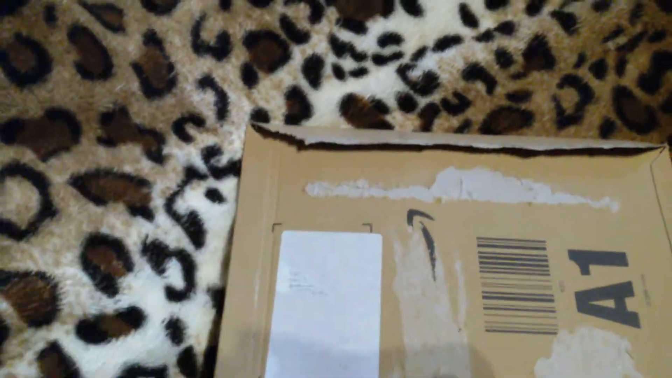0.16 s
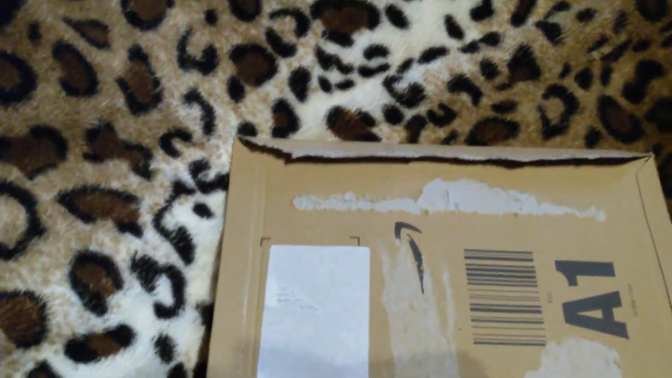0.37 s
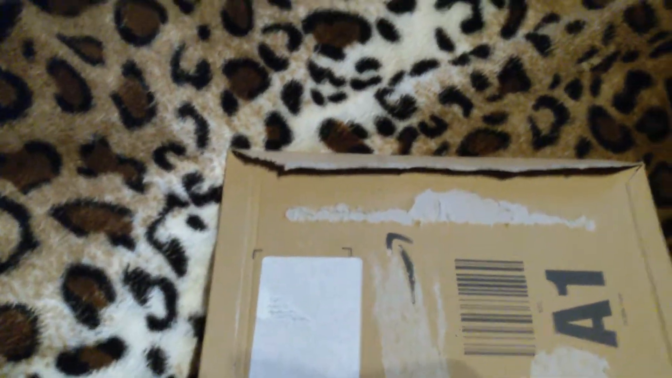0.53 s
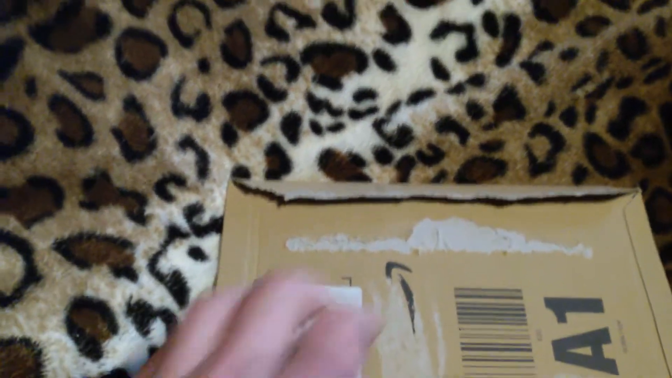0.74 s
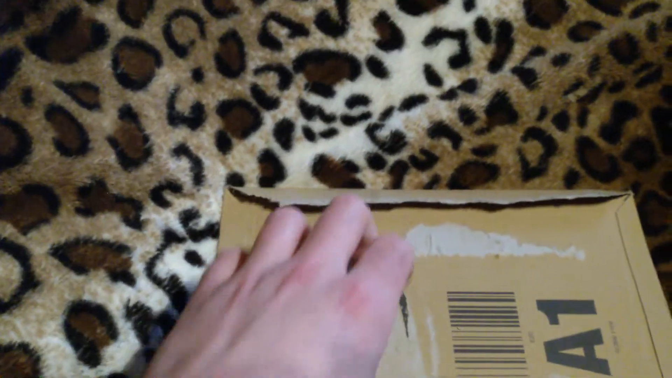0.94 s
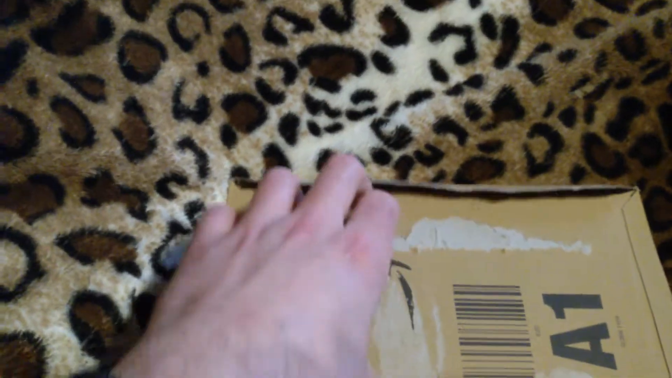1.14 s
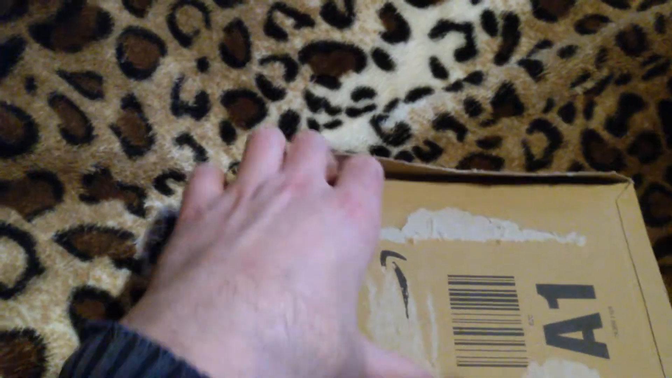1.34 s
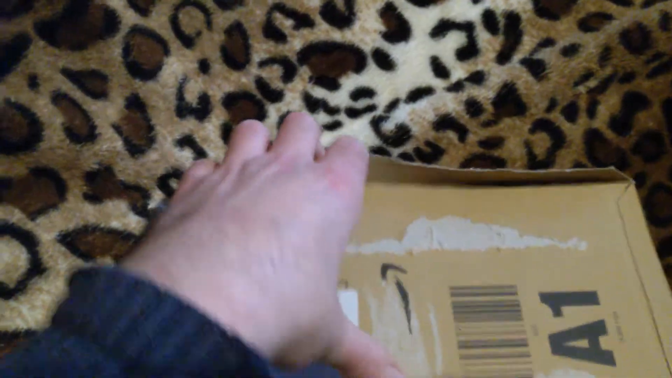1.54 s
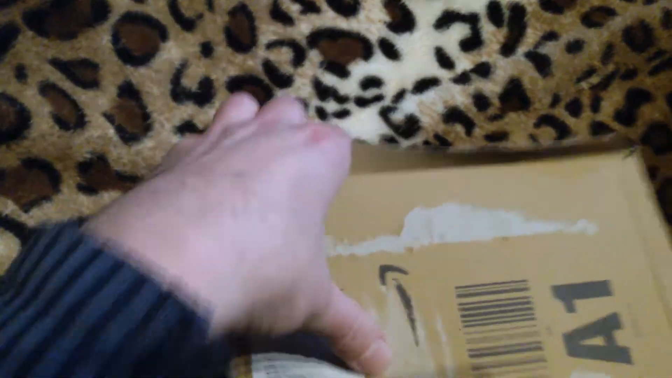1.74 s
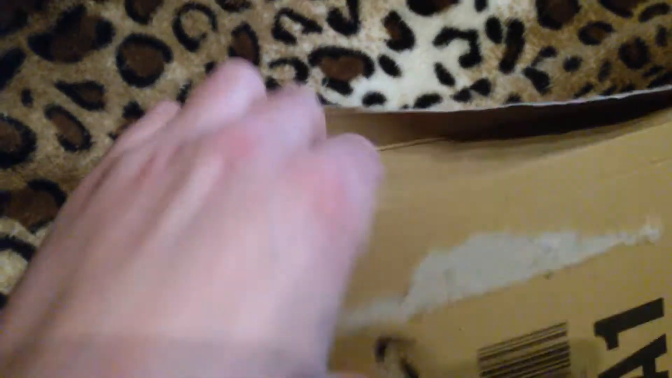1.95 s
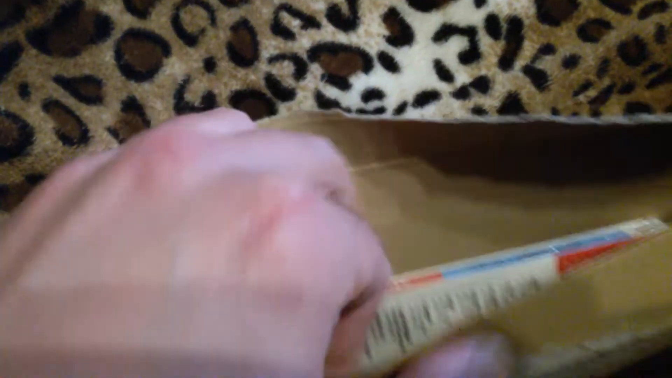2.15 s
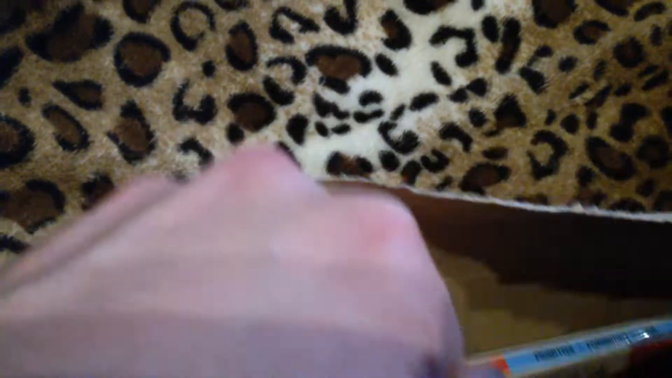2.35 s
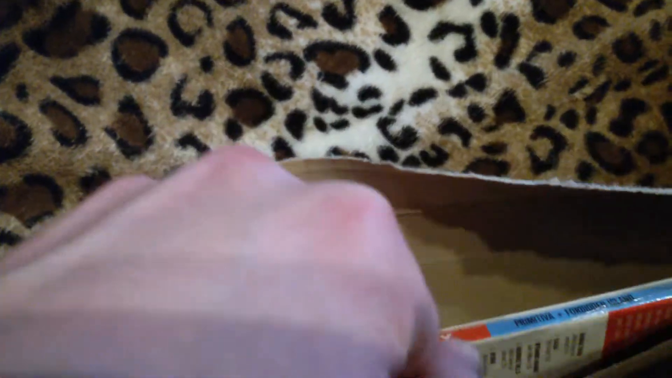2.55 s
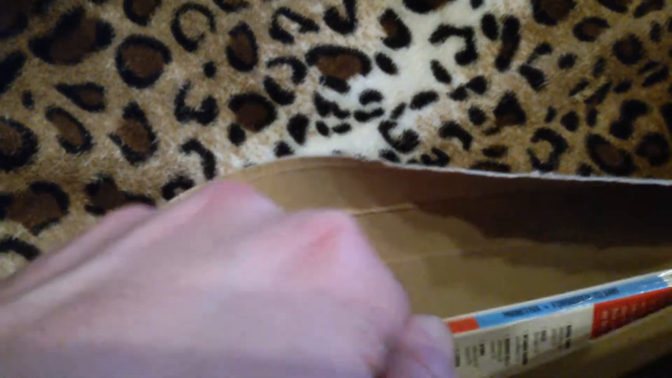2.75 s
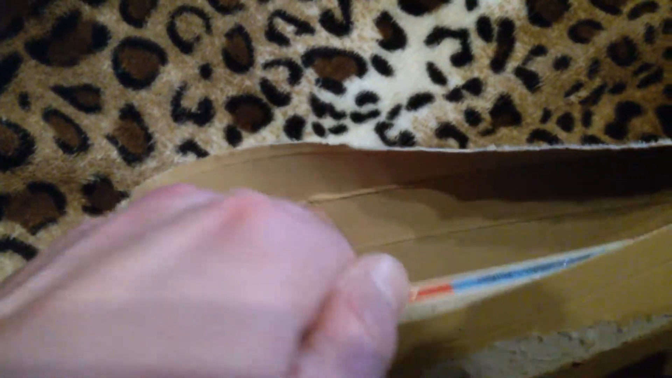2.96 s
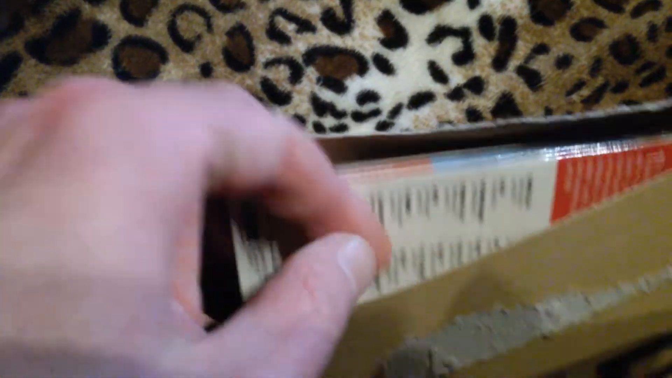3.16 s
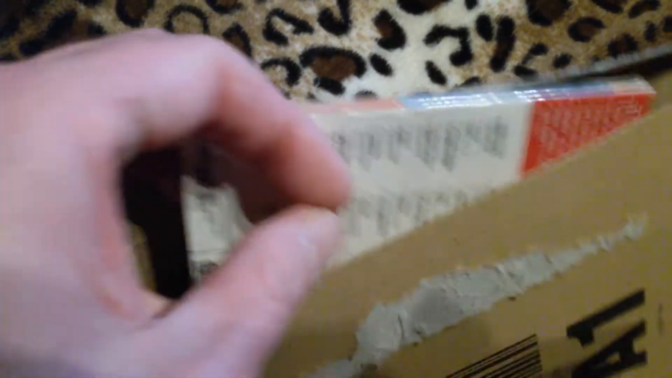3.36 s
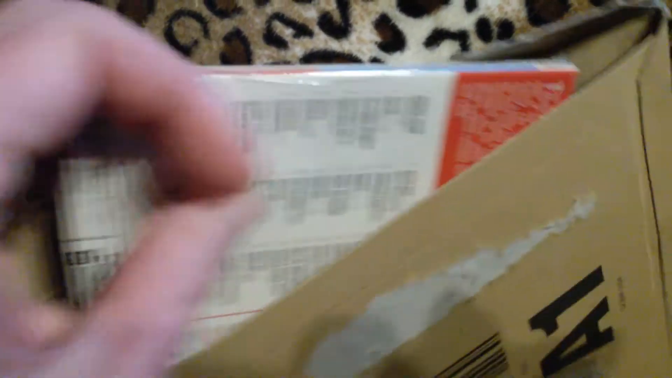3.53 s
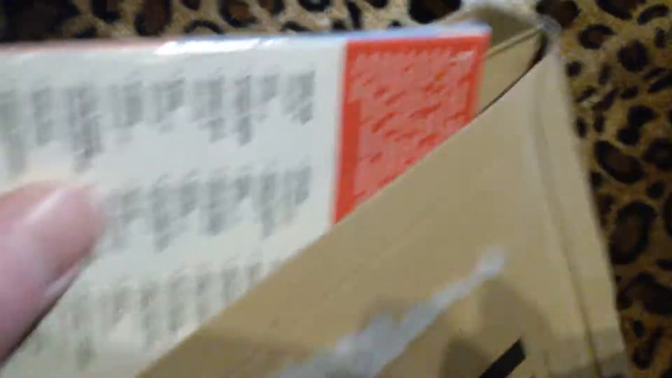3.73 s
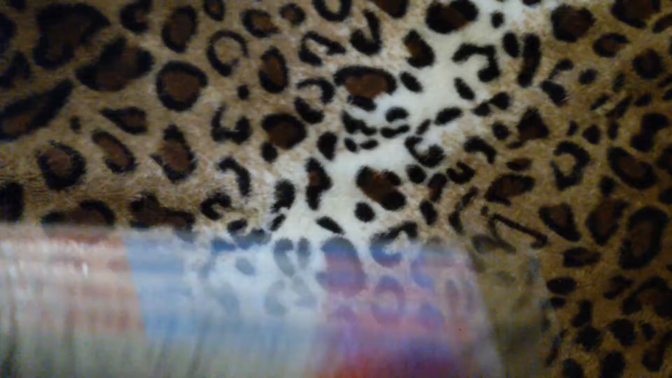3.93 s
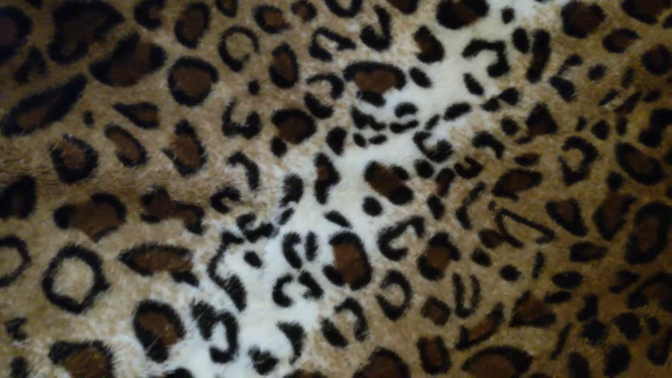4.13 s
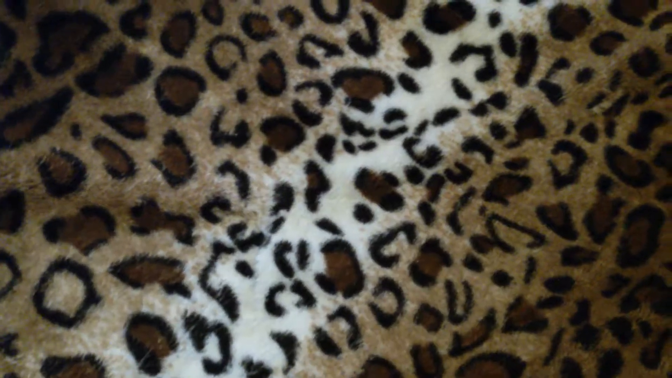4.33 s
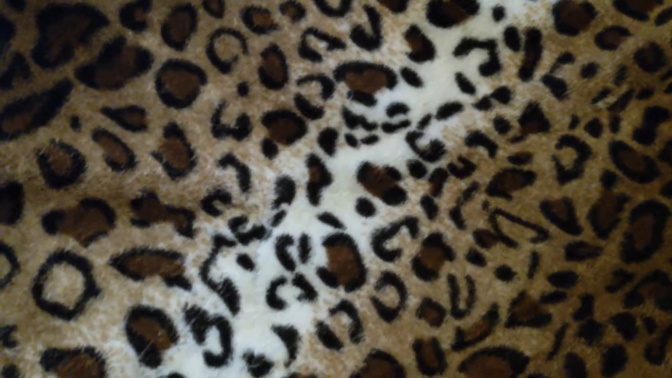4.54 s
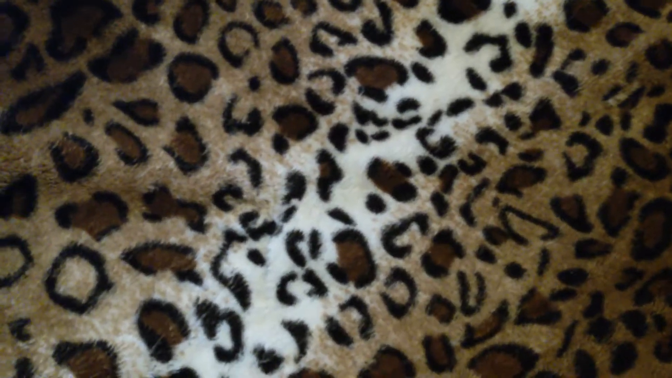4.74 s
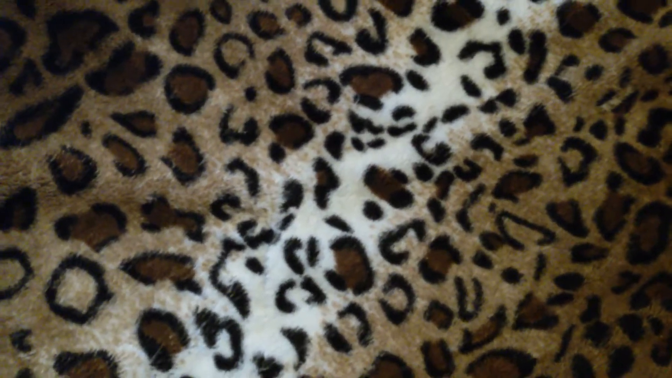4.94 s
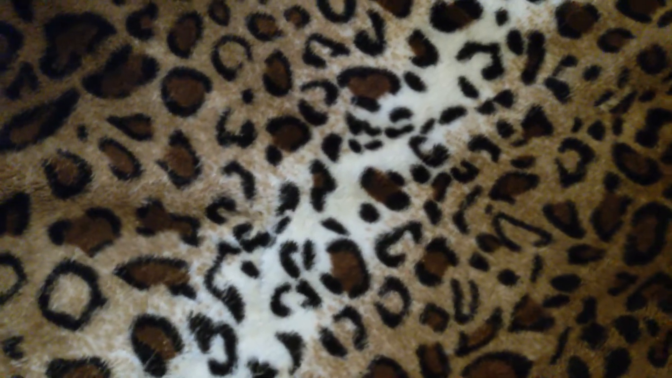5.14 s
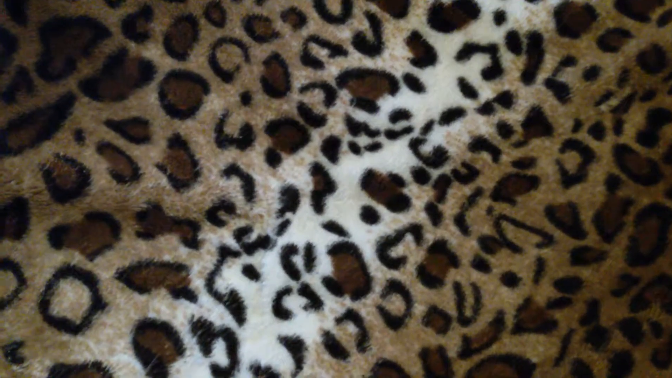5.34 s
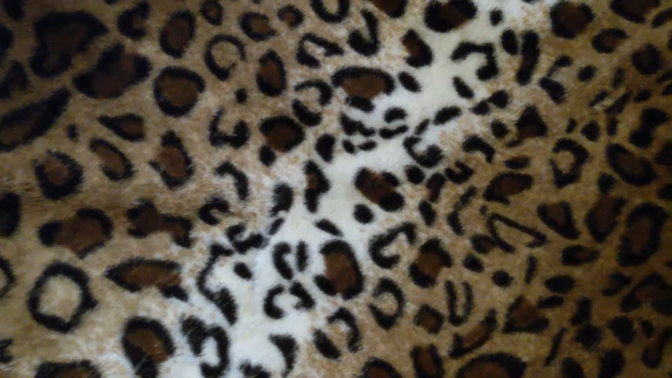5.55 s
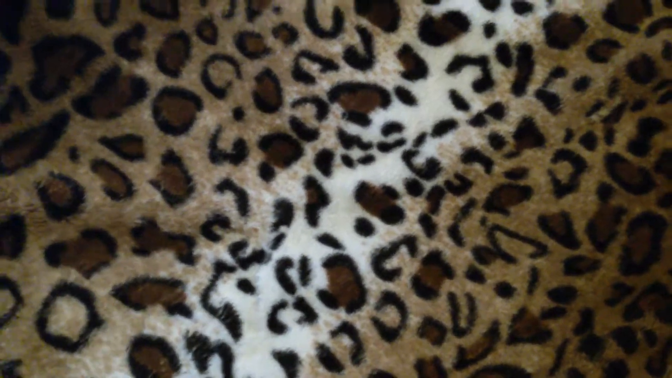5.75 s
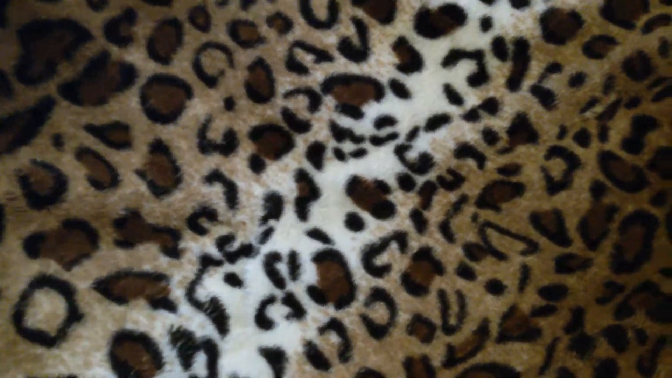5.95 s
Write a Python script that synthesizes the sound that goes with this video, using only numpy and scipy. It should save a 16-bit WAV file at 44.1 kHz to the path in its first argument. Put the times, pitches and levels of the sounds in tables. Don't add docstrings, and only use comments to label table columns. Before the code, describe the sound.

A close, dry indoor sound with steady faint hiss and low rumble, and a very short dull room reflection. At 0 s a crushed paper strip gives a tiny bright crackle that dies within 0.15 s; then almost nothing, except a minute tick at 0.5. From 0.88 s light bumps and papery brushing begin, with small fibre crackles to 1.2. Soft friction and two short even slides follow at 1.45-1.7. From 1.7 snaps and creases thicken, peaking at 1.9-2.25 with a hard knock at 1.97, coarse hollow scraping and low board thumps. Rubbing eases to 2.8, with a tap at 2.74. A short rasp at 3.04 leads into fading slides, and muffled bumps come at 3.35-3.65. Sharp pops and a thump cluster at 4.0-4.1, a slide and bright snap at 4.4-4.65. Near silence, then a flap at 4.9, a tap at 5.29, and quiet rubs at 5.7-5.95.

```python
import sys
import numpy as np
from scipy import signal
from scipy.fft import rfft, irfft
from scipy.io import wavfile
from scipy.ndimage import uniform_filter1d

SR = 44100
rng = np.random.default_rng(int(sys.argv[2]) if len(sys.argv) > 2 else 0)


def wav_record(signal):
    frames = np.transpose(np.atleast_2d(signal))
    bounded = np.clip(frames, -1, 1)
    quanta = np.round(bounded * 32767).astype(np.int16)
    wavfile.write(sys.argv[1], SR, quanta)


def boost_factor(decibels):
    exponent = np.asarray(decibels, float) / 20
    return 10 ** exponent


N = 264156


def rms_one(x):
    return x / np.sqrt(np.mean(x ** 2) + 1e-20)


def in_time(rows):
    s, *columns = np.transpose(rows)
    return [np.interp(np.arange(N) / SR, s, column) for column in columns]


def drift(rate):
    pole = np.exp(-80 * np.pi * rate / SR)
    noise = rng.standard_normal(N // 40 + 2002)
    slow = signal.lfilter([1], [1, -2 * pole, pole * pole], noise)[2000:]
    return np.interp(np.arange(N) / 40, np.arange(len(slow)), rms_one(slow - slow.mean()))


def resonate(x, hz, width_hz):
    r = np.exp(-np.pi * width_hz / SR)
    poles = [1, -2 * r * np.cos(2 * np.pi * hz / SR), r * r]
    return signal.lfilter([(1 - r * r) / 2, 0, (r * r - 1) / 2], poles, x + 1e-18)


def slips(shape, per_s, spread_db):
    sizes = boost_factor(spread_db * np.minimum(rng.exponential(1, shape), 4)) * rng.choice([-1, 1], shape)
    return rms_one(sizes * (rng.random(shape) < per_s / SR))


def body(push, modes, wander_db=0., wander_rate=20., centre_hz=None, favour_db=0., reach=.3, scattered=True):
    out = 0
    signs = rng.choice([-1., 1.], (2, N)) if scattered else [1, -1]
    for k, (hz, width_hz, db) in enumerate(modes):
        near = 0 if centre_hz is None else np.exp(-(np.log2(hz / centre_hz) / reach) ** 2)
        gain = boost_factor(db + favour_db * near + wander_db * drift(wander_rate)) / np.sqrt(width_hz / 3000)
        rung = resonate(push[:N] * signs[k % 2] * gain, hz, width_hz)
        out = out + (-1) ** (k // 2 * scattered) * resonate(rung, hz, 2.5 * width_hz)
    return out


# pitch_hz, level_db (per Hz)
NOISE_COLOUR = [(20, -42), (30, -15), (60, -11.5), (120, -12), (250, -16), (700, -24), (2500, -29.5),
                (14500, -32.5)]


def hiss():
    hz, db = np.transpose(NOISE_COLOUR)
    bins_hz = np.fft.rfftfreq(N, 1 / SR) + 1
    colour = boost_factor(np.interp(np.log(bins_hz), np.log(hz), db)) * (bins_hz > 18)
    noise = irfft(rfft(rng.standard_normal(N)) * colour, N)
    return boost_factor(-68 + 0.25 * drift(0.83)) * rms_one(noise)


# pitch_hz, width_hz, level_db
STRIP_MODES = [(220, 360, -16), (1800, 1300, -13), (4480, 900, -11), (6100, 2200, -12.5),
               (7960, 1600, -6.5), (10500, 4500, -18), (13000, 3800, -20)]
# time_s, level_db
STRIP_LEVEL = [
    (0.0, -43),
    (0.015, -43.5),
    (0.026, -54.5),
    (0.055, -62),
    (0.1, -70),
    (0.13, -75),
]


def paper_strip():
    level_db, = in_time(STRIP_LEVEL + [(STRIP_LEVEL[-1][0] + 0.081, -95)])
    crackle = slips(N, per_s=14000, spread_db=2.5)
    return boost_factor(level_db) * rms_one(body(crackle, STRIP_MODES, wander_db=1.5, wander_rate=180))


def snap_burst(breaks, db, length, first):
    t = np.arange(len(breaks)) / SR
    soft = 1 + (length / .013) ** 4
    breaks = np.where(np.arange(len(breaks)) == 12, first / soft, breaks)
    holds = (1 - np.exp(-t / (.0004 * soft))) * np.exp(-(t / np.clip(length, .001, .03)) ** 2)
    burst = breaks * holds * (1 + 0.5 * np.exp(-t / 0.00078))
    return burst * boost_factor(db) * np.sqrt(np.sum(holds ** 2) / np.sum(burst ** 2))


# pitch_hz, width_hz, level_db
PANEL_MODES = [(1400, 480, 1), (1700, 240, -1.5), (1938, 450, -3.5), (2317, 650, 1.5)]
SURFACE_MODES = [(3320, 500, -6.5), (3900, 690, -6.5), (4550, 1160, -5.5), (5300, 590, -7),
                 (6170, 1430, -5.5), (6900, 1200, -6.5), (7900, 2360, -2.5), (10000, 2500, -17.5),
                 (11340, 2000, -5.5), (14200, 2000, -0.5)]
POCKET_MODES = [(543, 223, 1.5), (667, 380, 2.5), (899, 316, 7.5), (908, 330, 6)]
BENDING_MODES = [(65.4, 39.5, -3.5), (101, 20, -6), (151, 69, -1.5), (212.4, 172, 3), (36, 16, -11.5)]
# pitch_hz, width_hz, level_db
KNOCK_MODES = [(358, 140, -9), (474, 250, 6.5)]
# start_s, level_db, pitch_hz, length_s
FINGER_TAPS = [(0.053, -45, 1600, .002), (1.636, -36, 1400, 0.0018), (1.971, -11, 950, .0028),
               (2.043, -21.5, 1900, .004), (2.044, -26, 3900, 0.0036), (2.136, -25, 810, 0.0061),
               (2.739, -25, 1250, 0.0042), (2.74, -34, 2450, 0.0023), (5.067, -43.5, 550, 0.0044),
               (5.068, -41.5, 1100, 0.0063), (5.2865, -27, 1160, 0.0029), (5.2875, -34, 3880, 0.0024),
               (5.287, -39.5, 6400, 0.0037), (5.2878, -36.5, 1740, 0.0028), (5.439, -39, 1190, 0.0022),
               (5.687, -51, 2000, 0.005)]
# start_s, level_db, pitch_hz, length_s
FIBRE_TEARS = [(0.499, -42, 4500, 0.001), (0.8875, -33, 1900, 0.0044), (0.952, -39, 2000, 0.03),
               (0.982, -37, 2130, 0.012), (1.053, -34.5, 4200, 0.013), (1.183, -36.5, 1950, 0.011),
               (0.938, -45.5, 2000, 0.0032), (0.98, -40, 2520, 0.0015), (1.285, -38.5, 3700, 0.0021),
               (3.249, -39, 6800, 0.026), (3.02, -33, 1800, 0.006), (3.786, -49, 8000, 0.0013),
               (3.803, -44, 9800, 0.0023), (1.7125, -24, 1800, 0.008), (1.7195, -24, 1700, .005),
               (1.8358, -24, 3800, 0.005), (2.997, -43, 1470, 0.011), (3.092, -41.5, 1400, 0.01),
               (3.794, -43, 1400, 0.012), (4.031, -27, 5300, 0.0035), (4.64, -23.5, 8200, 0.0024),
               (4.04, -48, 8700, 0.0036), (4.389, -36.5, 4500, 0.0026), (1.795, -33, 4300, .005)]
# start_s, level_db, pitch_hz, length_s
EDGE_BUMPS = [(0.881, -47, 2420, 0.0055), (0.904, -46, 2200, 0.0094), (1.169, -37, 1920, 0.0081),
              (1.702, -35.5, 2400, 0.0018), (1.793, -30, 700, 0.009), (1.9, -17.5, 1370, 0.0064),
              (1.98, -20.5, 1400, 0.0049), (2.164, -30, 1810, 0.016), (3.401, -30, 1540, 0.011),
              (3.614, -35, 1260, .012), (3.643, -30, 3430, 0.0033), (3.648, -27, 1090, 0.008),
              (3.812, -41, 1770, 0.0045), (3.83, -40.5, 780, 0.0086), (3.881, -44, 1700, 0.016),
              (3.926, -33, 880, 0.006), (4.044, -25.5, 1610, 0.0082), (4.087, -45, 980, 0.013),
              (4.191, -43, 1680, 0.0096), (4.265, -33.5, 1630, 0.0047), (4.294, -39, 1640, 0.0094),
              (4.388, -33.5, 1050, 0.006), (4.897, -31, 1540, 0.0087), (4.911, -37.5, 1530, 0.0067)]
# start_s, level_db, pitch_hz, length_s
CREASE_POPS = [(1.032, -39, 2020, 0.012), (1.82, -24, 1660, 0.0015), (1.872, -29.5, 1510, 0.007),
               (2.014, -27, 1600, 0.0033), (2.025, -27, 1700, 0.0027), (1.836, -18.5, 1700, 0.009),
               (3.058, -37, 1900, 0.0025), (3.348, -29, 2000, 0.011), (3.443, -33, 1750, 0.037),
               (4.005, -39, 1010, 0.0078), (4.055, -28, 1200, 0.0023), (4.059, -18, 1400, 0.0024),
               (4.251, -40.5, 1370, 0.0094), (4.629, -27, 2110, 0.011), (5.842, -49, 2830, 0.0098)]
# surface_db, thump_db, panel_db, ring width against pitch, size of opening break
FIBRE_SHARES = (-1.1, -15.5, -2, 0.38, 4.5)
CREASE_SHARES = (-27, -13.5, 4, 0.54, 6.5)
BUMP_SHARES = (-13.5, -3.5, -1.5, 0.76, 7)
TAP_SHARES = (-17, -17, -9, .45, 3)


def snaps():
    size = SR // 10
    t = np.arange(size) / SR
    kinds = ((FIBRE_TEARS, FIBRE_SHARES), (CREASE_POPS, CREASE_SHARES),
             (EDGE_BUMPS, BUMP_SHARES), (FINGER_TAPS, TAP_SHARES))
    events = [(*row, *shares) for rows, shares in kinds for row in rows]
    all_breaks = slips((len(events), size), per_s=16000, spread_db=2.5)
    ring, panel, surface, spit, thump = np.zeros((5, N + size))
    for event, breaks in zip(events, all_breaks):
        s, db, hz, length, surface_db, thump_db, panel_db, width, first = event
        at = slice(round(s * SR), round(s * SR) + size)
        burst = snap_burst(breaks, db, length, first)
        rung = resonate(resonate(burst, hz, 1.4 * hz), hz, width * hz)
        ring[at] += rung / np.sqrt(hz / 1500 * width / .65)
        panel[at] += boost_factor(panel_db) * burst * min(1, 3000 / hz)
        surface[at] += boost_factor(surface_db) * burst
        spit[at] += boost_factor(surface_db + 1.6 * db + 4.0) * burst
        thump[at] += boost_factor(db + thump_db) * (t / 0.0012) * np.exp(-t / 0.00052)
    when_s, _, rings_hz = np.array(sorted(events))[:, :3].T
    latest = np.searchsorted(when_s * SR, np.arange(N), "right") - 1
    struck_hz = rings_hz[np.clip(latest, 0, None)]
    board = boost_factor(-12) * body(panel, PANEL_MODES + POCKET_MODES, centre_hz=struck_hz, favour_db=2.5,
                            reach=0.2, scattered=False)
    board = board + boost_factor(-1.0) * body(surface, SURFACE_MODES)
    crack_low = signal.butter(4, 6770, fs=SR, output="sos")
    crack = signal.sosfilt(crack_low, boost_factor(9.5) * ring[:N] + board)
    spit_high = signal.butter(2, 9050, "high", fs=SR, output="sos")
    thumps = body(thump, BENDING_MODES + KNOCK_MODES, scattered=False)
    return crack + thumps + signal.sosfilt(spit_high, spit[:N])


def stroke(s, db, rise, fall):
    t = np.arange(0, N + 32, 32) / SR - s
    away = np.abs(t) / np.clip(np.where(t < 0, rise, fall), .004, 1)
    return boost_factor(2 * (db - 20 * away ** 0.7))


def slide(start, end, start_db, end_db):
    t = np.arange(0, N + 32, 32) / SR
    edge_s = 0.0092
    edges = (1 + np.tanh((t - start) / edge_s * 2)) * (1 - np.tanh((t - end) / edge_s)) / 4
    return edges ** 2 * boost_factor(2 * np.interp(t, [start, end], [start_db, end_db]))


# middle_s, half_length_s, level_db
HAND_PAUSES = [
    (0.93, 0.0074, -18),
    (2.529, 0.0048, -6),
    (2.812, 0.02, -10),
    (3.749, 0.022, -8),
    (4.153, 0.027, -2.5),
    (4.356, 0.038, -7),
    (4.778, 0.11, -29),
]


def gain_curve(power):
    t = np.arange(len(power)) * 32 / SR
    hush_db = sum(db * np.exp(-((t - s) / half) ** 4) for s, half, db in HAND_PAUSES)
    return np.interp(np.arange(N) / 32, np.arange(len(power)), np.sqrt(power) * boost_factor(hush_db))


# peak_s, level_db, length_s
BOARD_BENDS = [(0.686, -59, 0.024), (0.735, -59, 0.019), (0.897, -56, 0.029), (1.03, -54.5, 0.21),
               (1.169, -55.5, 0.088), (1.347, -62, 0.14), (1.483, -53, 0.15), (1.583, -52, 0.033),
               (1.658, -54, 0.1), (1.832, -43, 0.05), (2.058, -35.5, 0.11), (2.17, -39.5, 0.18),
               (2.31, -53, 0.1), (2.59, -49.5, 0.15), (2.766, -57, 0.056), (3.065, -51.5, 0.16),
               (3.19, -59.5, 1), (3.44, -57, 0.15), (3.646, -55, 0.27), (3.808, -45, 0.048),
               (3.94, -51, 0.077), (4.06, -38, 0.048), (4.264, -51, 0.22), (4.437, -47, 0.089),
               (4.571, -41.5, 0.046), (4.667, -52, 0.06), (4.91, -46, 0.031), (5.6, -64, 0.15),
               (5.898, -65, 0.1), (5.99, -62, .06)]


def flexing():
    gain = gain_curve(sum(stroke(s, db, length, length) for s, db, length in BOARD_BENDS))
    push = boost_factor(2.2 * drift(15.7)) * rng.standard_normal(N)
    return gain * rms_one(body(push, BENDING_MODES, wander_db=1.0, wander_rate=6.9))


# start_s, end_s, level_db, pitch_hz
SLOT_SONGS = [(1.47, 1.54, -58, 5400), (1.49, 1.54, -54, 2150), (1.99, 2.02, -48, 3900),
              (2.125, 2.182, -35, 820), (2.185, 2.23, -45, 700), (2.135, 2.175, -44, 3800),
              (2.17, 2.235, -47, 5300), (2.305, 2.37, -54, 5500), (2.89, 3.05, -58, 5500),
              (3.0, 3.06, -48, 2400), (3.03, 3.055, -46, 1550), (3.09, 3.32, -54, 2050),
              (3.08, 3.24, -55, 4800), (3.935, 4.0, -57, 5800), (4.192, 4.224, -55, 5900),
              (4.395, 4.63, -52, 1750), (4.395, 4.45, -53, 1100), (4.41, 4.47, -56, 3250),
              (4.39, 4.46, -59, 5400), (4.555, 4.61, -53, 3700), (4.42, 4.62, -61, 6900),
              (5.71, 5.77, -62, 2050)]


def singing(stream):
    out = np.zeros(N)
    for start, end, db, hz in SLOT_SONGS:
        at = slice(round(start * SR), round(end * SR))
        width_hz = .14 * hz
        band = rms_one(resonate(resonate(stream[at], hz, width_hz), hz, 2 * width_hz))
        out[at] += boost_factor(db) * signal.windows.tukey(len(band), .35) * band
    return out


# time_s, panel_hz, surface_hz, pocket_hz
HAND_HOLD = [(0.85, 2150, 5300, 786), (1.38, 2124, 4440, 800), (1.5, 2130, 5400, 803),
             (1.7, 2035, 5300, 800), (2.02, 1800, 3840, 894), (2.14, 1880, 3840, 844),
             (2.22, 1970, 5300, 664), (2.36, 2050, 5550, 784), (2.62, 2020, 4700, 790),
             (2.9, 2103, 5500, 820), (3.25, 2030, 4700, 823), (3.7, 1980, 3900, 900),
             (3.93, 1920, 5800, 857), (4.08, 1520, 4900, 700), (4.2, 1830, 5730, 820),
             (4.58, 1745, 3650, 960), (5.3, 1580, 4500, 950), (5.8, 2000, 3770, 900)]
# peak_s, level_db, rise_s, fall_s, pocket_db
BOARD_DRAGS = [(0.892, -48, 0.0073, 0.027, 0), (2.137, -34, 0.061, 0.018, -1), (2.46, -52, 0.14, 0.35, -9),
               (2.545, -47.5, 0.028, .1, -25), (3.022, -42, 0.1, 0.27, -9),
               (3.043, -33, 0.012, 0.0064, -19), (3.92, -38.5, 0.0098, 0.019, -1),
               (4.09, -48, 0.044, 0.058, -6), (4.52, -52, 0.2, 0.3, -16.5),
               (4.905, -44.5, 0.034, 0.048, -16), (5.075, -55, 0.016, 0.0073, 2),
               (5.294, -62.5, 0.044, 0.1, -14), (5.79, -63, 0.041, 0.12, -13),
               (5.875, -41, 0.028, 0.022, -14), (5.936, -46.5, 0.027, 0.025, -11)]
# peak_s, level_db, rise_s, fall_s, pocket_db
SURFACE_BRUSHES = [(0.978, -43, 0.023, 0.093, -8), (1.062, -44, 0.07, 0.099, -24),
                   (1.183, -54, 0.069, 0.11, -6), (1.342, -52.5, 0.14, 0.09, -25),
                   (1.4, -56.5, 0.018, 0.22, -27), (1.575, -49.5, 0.33, 0.28, -14.5),
                   (1.7, -51, 0.061, 0.13, -12), (1.81, -48, 0.21, 0.22, -23.5),
                   (1.98, -41.5, 0.16, 0.21, -8.5), (2.041, -38, 0.14, 0.077, -7),
                   (2.19, -36, 0.055, 0.098, -5.5), (2.232, -39.5, 0.43, 0.026, -5),
                   (2.335, -41, 0.09, 0.12, -8.5), (2.6, -46.5, 0.08, 0.21, -9),
                   (2.754, -50, 0.049, 0.031, -4.5), (3.255, -49, 0.02, 0.11, -24),
                   (3.4, -57, 0.61, 1, -9.5), (3.472, -48, 0.075, 0.035, -6), (3.64, -48.5, 0.22, 0.13, -1),
                   (3.813, -53, 0.16, 0.12, -0.5), (4.1, -52, 0.14, 0.15, -7),
                   (4.051, -35.5, 0.042, 0.02, -1), (4.278, -50.5, 0.11, 0.2, -3.5),
                   (4.585, -43.5, 0.048, 0.073, -11), (5.988, -58, 0.26, .1, -13)]
# start_s, end_s, start_db, end_db, pocket_db
EVEN_SLIDES = [(1.465, 1.553, -50.5, -51, -11), (1.602, 1.7, -48.5, -50, -14), (2.132, 2.186, -36, -36, -8),
               (2.878, 3, -55, -55, -23), (3.084, 3.324, -48, -58, -8), (3.877, 3.914, -54, -51, 0),
               (3.933, 4.03, -50, -59, -14), (4.192, 4.226, -48.5, -50, -8),
               (4.396, 4.498, -46.5, -54.5, -10), (4.552, 4.628, -43.5, -45, -12.5),
               (5.705, 5.771, -58.5, -53.5, -11), (5.844, 5.902, -50, -50, -18)]


def rubbing():
    # power, surface share dB, pocket share dB
    strokes = [(stroke(*row[:4]), 0, row[4]) for row in SURFACE_BRUSHES]
    strokes += [(stroke(*row[:4]), -3, row[4]) for row in BOARD_DRAGS]
    strokes += [(slide(*row[:4]), -2.5, row[4]) for row in EVEN_SLIDES]
    panel_gain = gain_curve(sum(power for power, _, _ in strokes))
    surface_gain = gain_curve(sum(power * boost_factor(2 * db) for power, db, _ in strokes))
    pocket_gain = gain_curve(sum(power * boost_factor(2 * db) for power, _, db in strokes))
    panel_hz, surface_hz, pocket_hz = in_time(HAND_HOLD)
    grip = boost_factor(1.14 * drift(18) + 1.0 * drift(85.0))
    stream = grip * slips(N, per_s=5000, spread_db=3.0)
    fine = grip * slips(N, per_s=15000, spread_db=1.5)
    panel = body(stream, PANEL_MODES, wander_db=1.8, wander_rate=27,
                 centre_hz=panel_hz, favour_db=10.5, reach=0.19)
    surface = body(0.19 * stream + fine, SURFACE_MODES, wander_db=3.0, wander_rate=12.0,
                   centre_hz=surface_hz, favour_db=7.5, reach=0.16)
    pocket = body(stream, POCKET_MODES, wander_db=2.5, wander_rate=130,
                  centre_hz=pocket_hz, favour_db=2.5, reach=.22)
    n = np.arange(N)
    surface = surface + sum(0.19 ** k * np.interp(n - k * SR / panel_hz, n, surface) for k in (1, 2))
    rubbed = panel_gain * rms_one(panel) + surface_gain * rms_one(surface) + pocket_gain * rms_one(pocket)
    return rubbed + singing(stream)


# start_s, peak_db, pitch_hz, t60_s
BOARD_WOBBLES = [
    (1.791, -34, 240, .04),
    (1.974, -33, 105, .09),
    (4.06, -33, 150, .07),
    (4.643, -46, 88, .12),
    (4.9, -38, 380, .04),
    (4.912, -49, 90, .11),
]


def wobbles():
    out, t = np.zeros(N + SR), np.arange(SR // 4) / SR
    for s, db, hz, t60 in BOARD_WOBBLES:
        at = round(s * SR)
        out[at:at + len(t)] += boost_factor(db - 60 * t / t60) * np.sin(2 * np.pi * hz * t)
    return out[:N]


def room(x):
    t60_s, level_db, cut_hz = 0.096, -18.5, 2400
    t = np.arange(SR // 3) / SR
    tail = rng.standard_normal(len(t)) * boost_factor(-60 * t / t60_s) * (t > .004)
    tail = signal.lfilter([1], [1, -np.exp(-2 * np.pi * cut_hz / SR)], tail)
    return boost_factor(level_db) * signal.fftconvolve(x, tail / np.sqrt(np.sum(tail ** 2)))[:N]


def scene():
    board_top = signal.butter(2, 9700, fs=SR, output="sos")
    rubbed = signal.sosfilt(board_top, rubbing() + flexing())
    near = rubbed + snaps() + wobbles() + paper_strip()
    return np.tile(near + room(near) + hiss(), (2, 1))


def thinned(x):
    hz, _, cells = signal.stft(x, SR, nperseg=2048)
    power = np.abs(cells) ** 2
    middle = (hz > 500) & (hz < 6000)
    loud_db = 10 * np.log10(np.sum(power[middle], axis=0) + 1e-20)
    busy = np.clip((loud_db + 76) / 28, 0, 1) ** .4 * (np.diff(loud_db, prepend=0) < 12)
    uneven_db = rng.normal(0, 2.5, (len(hz) // 32 + 1, len(busy)))
    uneven_db = np.repeat(uneven_db, 32, axis=0)[:len(hz)]
    tilt_db = 10 * np.log2(hz[:, None] / 12000 + 1e-9)
    strict_db = 3 + uneven_db + tilt_db - 22 * (1 - busy)
    threshold = uniform_filter1d(power, 32, axis=0) * boost_factor(2 * strict_db)
    heard = (power > threshold) | (hz[:, None] < 8000)
    strengthened = boost_factor(3.5 * np.clip(strict_db / 3, 0, 1))
    return signal.istft(cells * heard * strengthened, SR, nperseg=2048)[1][:N]


def low_pass(x):
    return signal.sosfilt(signal.butter(12, 15330, fs=SR, output="sos"), x)


def record(dry):
    top_cut = signal.cheby2(20, 60, 15000, fs=SR, output="sos")
    mono = signal.sosfilt(top_cut, thinned(dry[0]))
    side_waver = boost_factor(-38.5) * drift(500) * [[1], [-1]]
    return low_pass(mono * (1 + side_waver))


dry = scene()
out = record(dry)
wav_record(out)
```